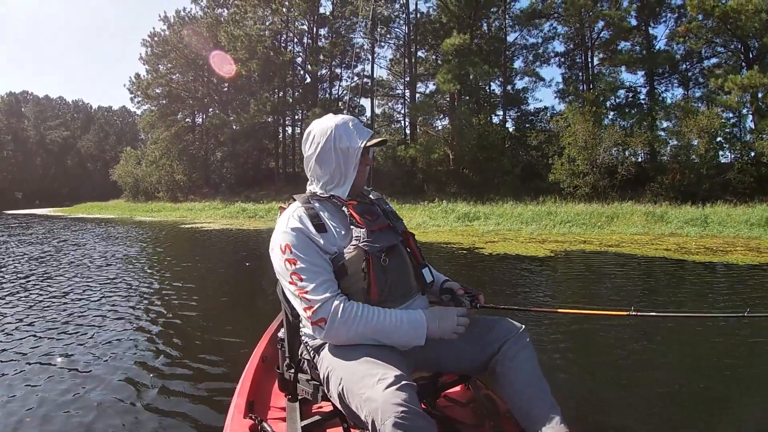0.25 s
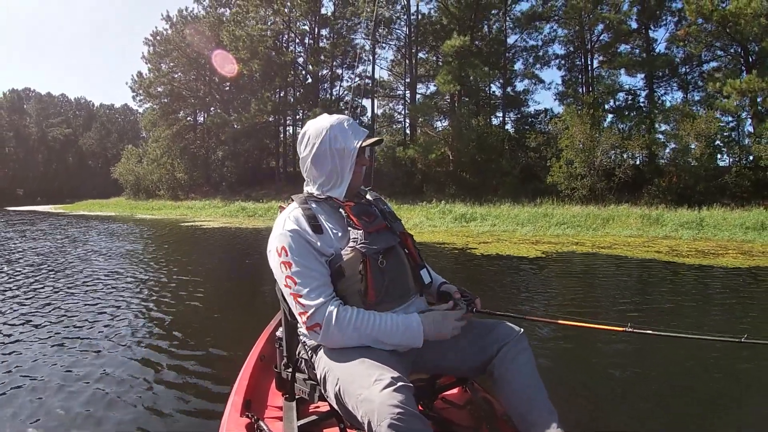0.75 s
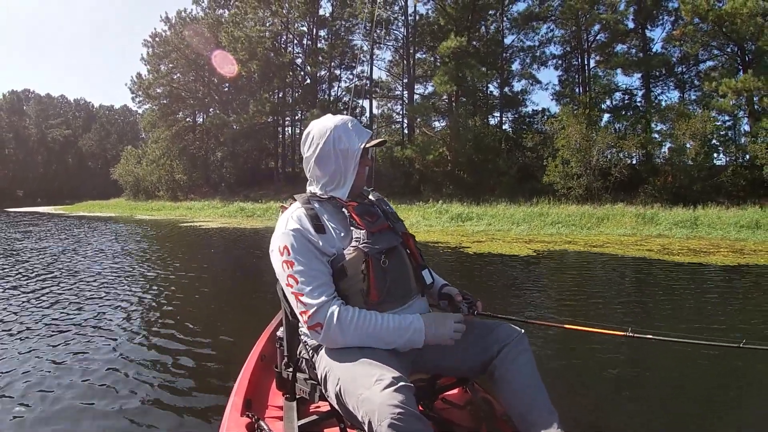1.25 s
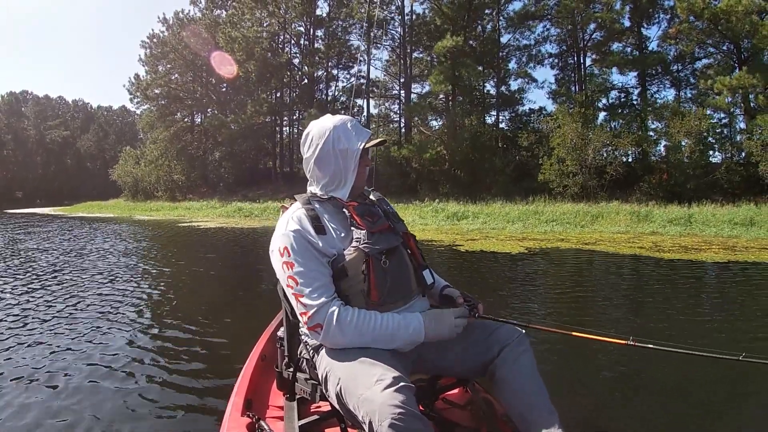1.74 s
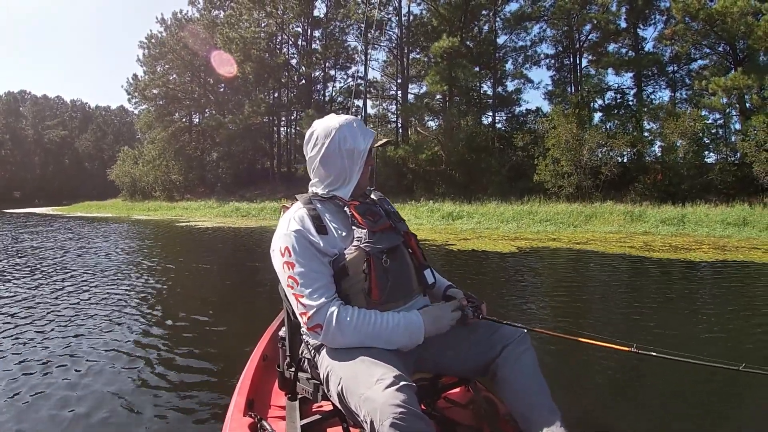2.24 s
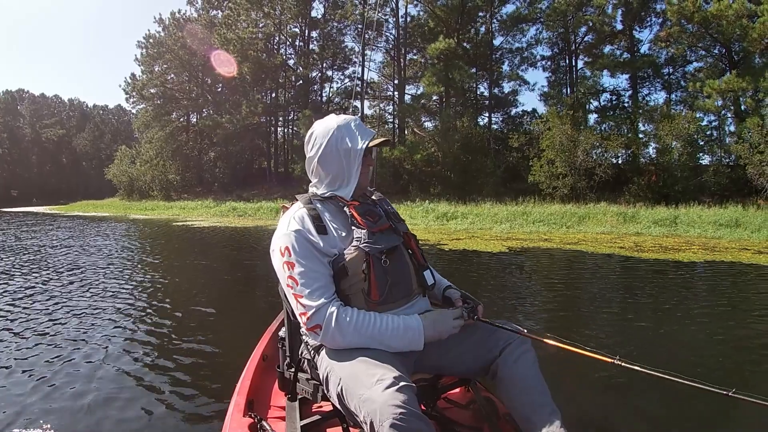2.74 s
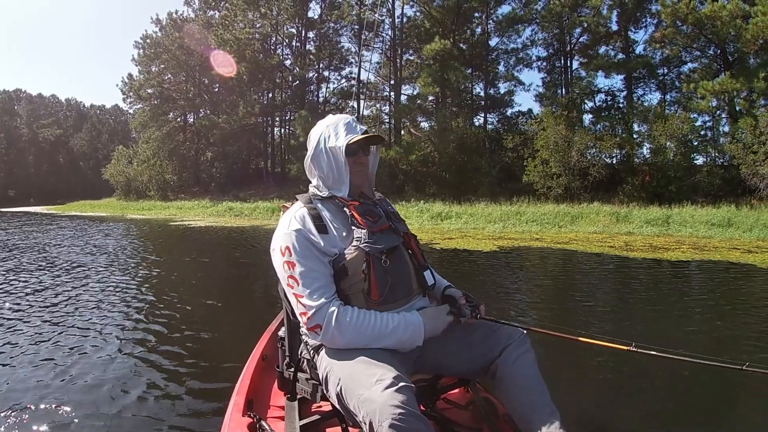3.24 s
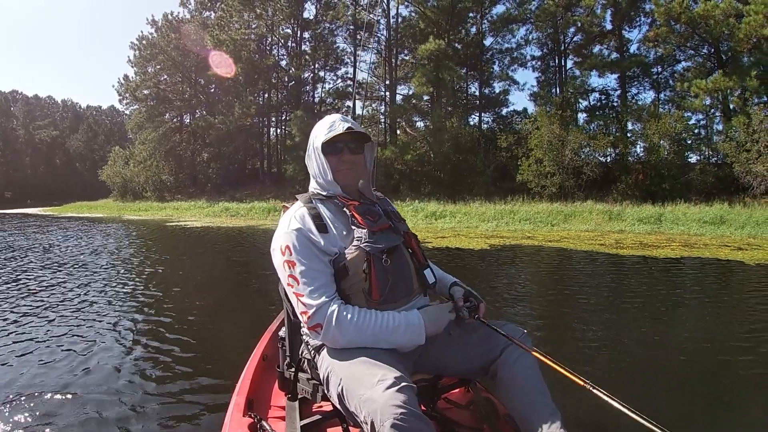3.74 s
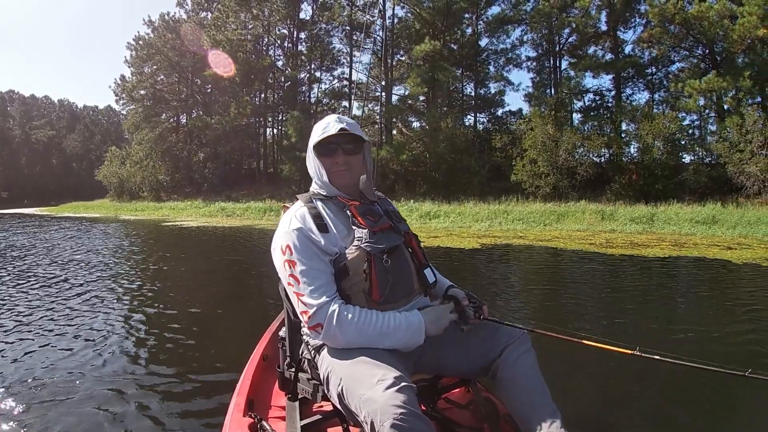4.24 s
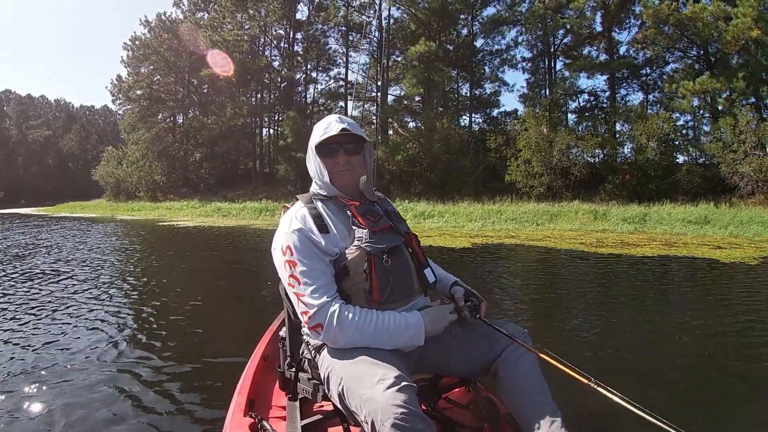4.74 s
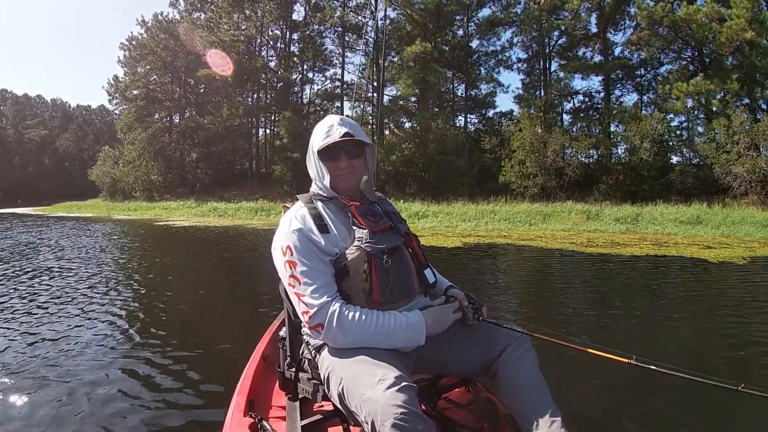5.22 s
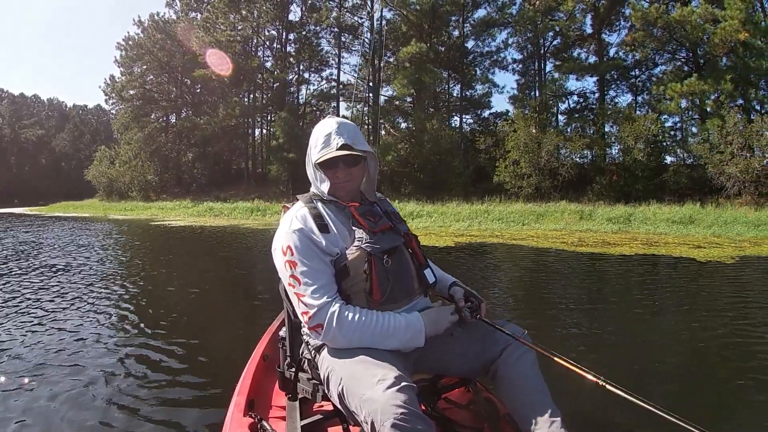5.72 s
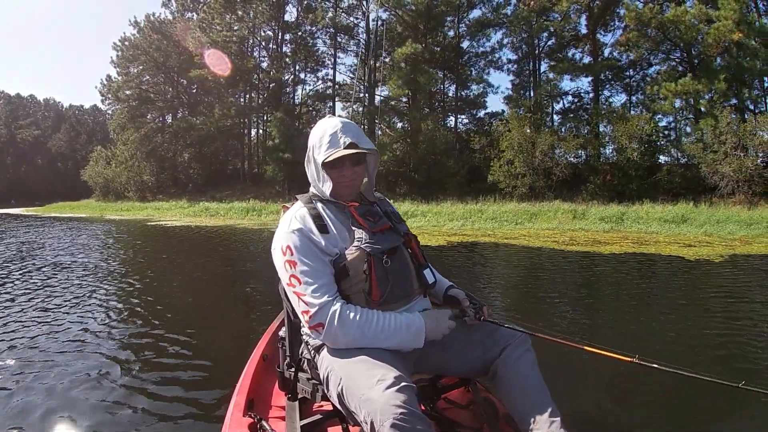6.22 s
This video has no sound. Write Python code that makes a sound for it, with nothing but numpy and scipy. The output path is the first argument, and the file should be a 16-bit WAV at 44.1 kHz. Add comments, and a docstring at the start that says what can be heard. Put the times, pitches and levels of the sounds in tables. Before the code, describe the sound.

A breezy pond edge outdoors, about six and a half seconds, heard on an open microphone. From the start a far cicada chorus makes a high, wavering hiss, with a nearer singer buzzing in a fast, raspy throb and another just dying away. Deep wind rumbles at once, then eases. A short rising bird chirp comes at 0.6, a tiny dry tick near 0.75. Wind buffets cluster around 1.4 to 1.8 and again near 2.6 to 3.2. A second cicada grows from about 1 to 2.5 and fades by 4.8, while the loudest emerges, swelling strongly from 3.5 to a peak around 5, stumbling briefly near 5.6 and 6.4. Faint birds whistle and chip throughout, most noticeably around 3.2, 3.7 and 4.4, slightly echoed by trees. A soft leafy, watery hush stays underneath. Two faint ticks come near 6.3; the shrilling continues to the end.

```python
"""Cicadas shrill in the trees beside a pond: four near singers, each a click train built from pure tones.
Behind them a far chorus is a blur of three hissing bands of noise. Wind rumbles on the microphone as low,
lumpy noise with sudden buffets, and the bank hushes softly, with a thin leafy hush of higher noise. Distant
birds whistle and chip in bending sines over blurred noise twitter; a few dry ticks are tiny puffs of noise."""
import sys
import numpy as np
from scipy import signal
from scipy.fft import rfft, irfft, next_fast_len
from scipy.io import wavfile

SR = 44100
rng = np.random.default_rng(int(sys.argv[2]) if len(sys.argv) > 2 else 0)


def master(y):
    """Save y as 16-bit WAV."""
    cut = np.clip(np.atleast_2d(y).T, -1, 1)
    pcm = np.round(cut * 32767)  # scale
    wavfile.write(sys.argv[1], SR, pcm.astype(np.int16))


N = 285327  # samples in the scene
LOWEST_HZ, CUTOFF_HZ = 3450, 15700  # bottom of the near singers' tones; top of the whole sound


def amp(db):
    """Turn decibels into a gain."""
    return 10 ** (np.asarray(db) / 20)


def rms_one(x):
    """Scale a sound to an rms (average strength) of 1."""
    return x / np.sqrt(np.mean(x ** 2) + 1e-20)


def in_time(rows):
    """Join a table's points with straight lines, giving each column a value at every sample."""
    s, *columns = np.transpose(rows)
    return [np.interp(np.arange(N) / SR, s, column) for column in columns]


def at_hz(points, hz):
    """Read a spectrum at any pitch, joining its points on a log-frequency axis."""
    table_hz, table_db = np.array(points).T
    return np.interp(np.log(hz), np.log(table_hz), table_db)


def drift(rate, step=40):
    """Slow random wandering of spread 1, one value every step samples; a higher rate wanders faster."""
    r = np.exp(-2 * np.pi * step * rate / SR)
    settle = 2000  # values thrown away while the smoothing filter settles
    white = rng.standard_normal(N // step + settle + 1)
    return rms_one(signal.lfilter([1], [1, -2 * r, r * r], white)[settle:])


def stretch(slow, step=40):
    """Read slow values at every sample."""
    return np.interp(np.arange(N) / step, np.arange(len(slow)), slow)


def hump(s, half_s):
    """A smooth rise and fall of height 1 around a moment."""
    return np.cos(np.pi / 2 * np.clip((np.arange(N) / SR - s) / half_s, -1, 1)) ** 2


def coloured(spectrum):
    """Steady noise of rms 1: white noise whose frequencies are weighted by the spectrum."""
    size = next_fast_len(N)
    hz = np.maximum(np.fft.rfftfreq(size, 1 / SR), 1)
    white = rfft(rng.standard_normal(size))
    return rms_one(irfft(white * amp(at_hz(spectrum, hz)), size)[:N])


# depth of the throb at each pitch, before each singer's own offset: f/Hz, level/dB
THROB_DEPTH = [(3400, -14), (4300, -7), (5200, -2), (6100, -3), (7000, -13.5), (8000, -19), (10000, -7),
               (16000, -12)]


def singer(rows, clicks, jitter, body, throb_per_s, throb_db, fading_db, tilt_db=np.zeros(1)):
    """A click train built from its harmonics; repeated clicks in each cycle strengthen some and cancel others."""
    rate, level_db = in_time(rows)
    lag_a, strength_a, lag_b, strength_b = in_time(clicks)
    start = int(max(rows[0][0], 0) * SR)
    end = int(rows[-1][0] * SR) if rows[-1][0] < 6 else N
    singing = slice(start, end)

    wobble = np.clip(jitter, 0, 1) * stretch(drift(60))  # timing error in cycles
    cycles = (np.cumsum(rate) / SR + wobble)[singing]
    throb_cycles = np.cumsum(throb_per_s * np.ones(N))[singing] / SR
    throb = np.exp(2j * np.pi * throb_cycles).astype(np.complex64)
    turn = np.exp(2j * np.pi * cycles).astype(np.complex64)

    step = 256  # samples between updates of the slow settings
    below_first = int(LOWEST_HZ / rate.mean())
    last = int(CUTOFF_HZ / rate.mean())
    out, power, wave = 0, 0, turn ** below_first
    for k in range(below_first + 1, last + 1):
        wave = wave * turn  # the next harmonic up
        hz = k * rate.mean()
        shape = amp(at_hz(body, hz) + tilt_db[::step] * np.log2(hz / 7000))
        comb = abs(1 + strength_a[::step] * np.exp(2j * np.pi * k * lag_a[::step]))
        # the second lag repeats both the first click and its repeat
        comb = comb * abs(1 + strength_b[::step] * np.exp(2j * np.pi * k * lag_b[::step]))
        power = power + (shape * comb) ** 2 / 2
        side = amp(throb_db + at_hz(THROB_DEPTH, hz))  # a throb puts a side line above and below
        # echoes off the trunks scatter the phases and make each line fade on its own
        lines = []
        for size in (comb, side, side):
            fading = amp(fading_db * drift(2.5, step))
            phase = np.exp(2j * np.pi * rng.random())
            slow_line = shape * size * fading * phase
            lines.append(np.repeat(slow_line, step)[singing].astype(np.complex64))
        line, above, below = lines
        out = out + (wave * (line + above * throb + below * throb.conj())).real

    song = np.zeros(N)
    song[singing] = amp(level_db[singing]) * out / np.repeat(np.sqrt(power), step)[singing]
    return song


# near singers, levels before throb and fading: t/s, click cycles per second, level/dB
# (the loud singer's level is also before its stumbles)
LOUD_SINGER = [(1.1, 281.5, -75), (1.6, 281.46, -58), (2.3, 281.37, -56.5), (2.8, 281.31, -52.8),
               (3.4, 281.19, -50.5), (3.72, 281.12, -47), (3.9, 281.03, -45), (4.32, 280.82, -45.3),
               (4.56, 280.75, -44.6), (4.8, 280.68, -41), (5.04, 280.61, -40.5), (5.4, 280.5, -42.4),
               (5.55, 280.47, -42), (5.63, 279.95, -43), (5.72, 279.91, -40.8), (5.9, 279.85, -42.2),
               (6.47, 279.7, -42.2)]
MIDDLE_SINGER = [(.5, 258, -77), (.9, 260.1, -67), (1.3, 261, -59), (1.8, 260, -55), (2.5, 259.6, -49.5),
                 (3.3, 259.9, -49), (3.9, 261.4, -50), (4.3, 260, -47), (4.8, 261.5, -77)]
EARLY_SINGER = [(0, 254.6, -51.5), (.8, 255.1, -53), (1.3, 257.3, -51), (2.0, 255.8, -53), (2.3, 257, -52),
                (2.7, 259.4, -64)]
ENDING_SINGER = [(0, 261, -50.5), (.2, 261, -67), (.45, 266, -68)]
# two lags in each cycle, each repeating the clicks before it:
# t/s, lag/cycles, strength (0-1), second lag/cycles, second strength (0-1)
LOUD_CLICKS = [(2.2, 0.37, .5, .49, .9), (2.6, .334, .9, .487, .9), (4.2, .339, 0.8, .472, 0.78),
               (4.32, .34, 0.39, .469, .9), (4.92, .344, 0.48, .46, 0.94), (5.28, .344, .5, .46, 0.11),
               (5.4, .344, .5, .439, .5), (5.5, 0.34, .9, .43, .7), (5.63, .348, 0.75, .462, 0.58),
               (5.72, 0.35, 1, .457, .5), (6.2, .348, .9, .448, .5), (6.35, .348, .9, .448, .1),
               (6.42, .348, 0.83, .46, .5)]
MIDDLE_CLICKS = [(2.5, 0.4915, .85, 0.38, .11), (3.3, .495, 0.29, .362, 0.11)]
EARLY_CLICKS = [(0, .5, 0.86, 0.313, .1), (1.3, .478, .93, 0.307, 0.075)]
ENDING_CLICKS = [(0, .464, 0.6, .3, .1)]
# sound of one click through the singer's body and the air, relative: f/Hz, level/dB
LOUD_BODY = [(3400, -22), (3900, -7.5), (4500, -7.5), (5500, -9), (6200, -4), (6750, -2), (7400, 1),
             (8100, -1.5), (9000, -13), (10000, -27.5), (11000, -35.5), (13000, -44), (16000, -43)]
MIDDLE_BODY = [(4500, -13.5), (5500, -7), (6500, -6), (7300, 2), (8000, -2), (8600, -6), (9200, -40),
               (16000, -46)]
EARLY_BODY = [(3000, -17), (3900, -12), (4800, -6.5), (6000, -7.5), (6900, 1.5), (7600, -8), (8400, -12),
              (9200, -27), (16000, -58)]
# throb of the loud singer: t/s, throbs per second, added brightness in dB per octave
LOUD_THROB = [(1.5, 130, 2), (3.7, 107, 1.5), (5.0, 110, -0.5), (5.4, 96, -1.5), (5.9, 110, 3.5),
              (6.47, 97, 3)]
# moments when the loud singer stumbles: t/s, half length/s
FALTERS = [(5.59, 0.025), (6.383, 0.022)]
FALTER_DIP_DB, FALTER_JITTER = 2, 0.011  # at the worst: loss of level, added timing jitter in cycles


def near_cicadas():
    """Four singers whose click trains throb about a hundred times a second; the loud one stumbles at times."""
    throb_per_s, tilt_db = in_time(LOUD_THROB)
    falter = sum(hump(*row) for row in FALTERS)
    loud_jitter = .001 + FALTER_JITTER * falter
    loud = singer(LOUD_SINGER, LOUD_CLICKS, loud_jitter, LOUD_BODY, throb_per_s,
                  throb_db=0, fading_db=1, tilt_db=tilt_db)
    middle = singer(MIDDLE_SINGER, MIDDLE_CLICKS, .0022, MIDDLE_BODY, 104.3, throb_db=0, fading_db=2)
    early = singer(EARLY_SINGER, EARLY_CLICKS, .0018, EARLY_BODY, 104, throb_db=-4, fading_db=2)
    ending = singer(ENDING_SINGER, ENDING_CLICKS, .002, MIDDLE_BODY, 104, throb_db=-4, fading_db=2)
    return amp(-FALTER_DIP_DB * falter) * loud + middle + early + ending


# far chorus: t/s, lower voices level/dB, middle voices level/dB, highest voices level/dB
CHORUS = [(0, -53.5, -51.5, -57.5), (1, -53.5, -53.5, -61), (2, -54.5, -58.5, -62), (3, -53.5, -53, -57),
          (3.5, -53.5, -57, -57), (3.8, -52.5, -53, -54), (4.1, -53.5, -50, -57.5), (4.5, -53, -53, -57),
          (5, -53, -50, -65), (5.4, -53, -51.5, -56), (5.7, -51, -50.5, -52.5), (6.1, -53, -53.5, -58),
          (6.47, -51, -47.5, -52)]
# colour of each band of voices, relative level in each Hz: f/Hz, level/dB
LOWER_VOICES = [(2700, -30.5), (3300, -14.5), (3900, -4), (4600, -4), (5200, -1), (5900, -0.5), (6600, -11),
                (8000, -37), (10000, -46), (16000, -90)]
MIDDLE_VOICES = [(4500, -30.5), (5600, -10), (6300, -2), (7100, 0), (7600, 0.5), (8300, -29), (10000, -60)]
HIGHER_VOICES = [(6500, -33.5), (7300, -6.5), (7800, -2.5), (8400, -3.5), (9000, -9), (9500, -15.5),
                 (10100, -19), (11500, -31.5), (13100, -32), (16000, -52)]


def far_chorus():
    """Countless distant singers blur into three bands of hiss, each swelling and sinking."""
    voices = (LOWER_VOICES, MIDDLE_VOICES, HIGHER_VOICES)
    return sum(amp(level_db) * coloured(colour) for level_db, colour in zip(in_time(CHORUS), voices))


# breeze on the microphone, before its quick random swings: t/s, level/dB
BREEZE = [(0, -28.5), (.2, -36), (.6, -39.5), (1.2, -32.5), (1.9, -37.5), (2.2, -30.5), (2.75, -41),
          (3.4, -33.5), (4.2, -33.5), (4.7, -37.5), (5.2, -40), (6, -36), (6.47, -38)]
# sudden buffets, each added to the breeze: t/s, half length/s, peak level/dB
BUFFETS = [(0.12, .08, -35), (0.709, 0.061, -37), (1.03, 0.036, -32), (1.4, 0.033, -29.5),
           (1.468, .045, -24), (1.551, 0.023, -27), (1.647, 0.045, -31), (1.748, .05, -30),
           (2.477, 0.029, -39), (2.631, 0.049, -28.5), (2.88, 0.071, -35), (3.028, .04, -25),
           (3.219, 0.018, -24.5), (3.363, 0.062, -39), (3.536, 0.031, -40), (3.997, 0.028, -35.5),
           (4.341, 0.063, -34), (4.582, 0.056, -32), (4.967, 0.034, -37), (5.098, 0.037, -29.5),
           (5.213, 0.031, -29), (5.342, 0.054, -34.5), (5.548, 0.035, -29.5), (5.675, 0.038, -35),
           (5.928, 0.036, -29), (6.332, .06, -33)]
# colour of the wind rumble, relative level in each Hz: f/Hz, level/dB
GUST_COLOUR = [(8.8, -28), (15, 3), (32, -0.5), (59, 1), (111, -8), (200, -21), (260, -32), (440, -120)]
# hush of air, leaves and water, relative level in each Hz: f/Hz, level/dB
HUSH_COLOUR = [(59, -40), (100, -3), (202, -8.5), (275, -17), (374, -20), (461, -25.5), (792, -28.5),
               (953, -34.5), (1900, -46.5), (2470, -73), (4180, -120)]
HUSH_DB = -44.5  # middle of its gentle wandering


def wind():
    """Lumpy low pressure swings on the microphone, with sudden buffets, over a nearly steady hush."""
    breeze = amp(in_time(BREEZE)[0] + 2.0 * stretch(drift(8.8)))
    buffets = sum(amp(peak_db) * hump(s, half_s) for s, half_s, peak_db in BUFFETS)
    rumble = (breeze + buffets) * coloured(GUST_COLOUR)
    hush = amp(HUSH_DB + 0.87 * stretch(drift(3.2))) * coloured(HUSH_COLOUR)
    return rumble + hush


# far-off bird twitter, and a thin leafy hush above it in pitch:
# t/s, twitter level/dB before its flutter, leafy hush level/dB
TWITTER_AND_LEAVES = [(0, -73.5, -74), (.43, -73, -74.5), (.67, -66.5, -70), (2.2, -69, -72),
                      (2.65, -72.5, -77), (3.51, -69.5, -73), (3.91, -76.5, -77.5), (4.56, -68.5, -75),
                      (4.8, -80, -79), (5.1, -72.5, -76), (6.0, -79, -80), (6.47, -70.5, -82)]
# bird notes, pitches before the waver: t/s, length/s, start f/Hz, middle f/Hz, end f/Hz, level/dB
NOTES = [(0.597, 0.054, 2190, 2740, 3240, -59), (1.098, .05, 2200, 2050, 1930, -68),
         (1.195, .07, 1596, 1540, 1480, -72), (1.45, .04, 2050, 2060, 2050, -66),
         (1.52, 0.072, 1530, 1500, 1450, -70), (1.86, .09, 1570, 1470, 1385, -69),
         (2.118, .04, 2000, 2050, 2150, -73), (2.41, .07, 1700, 1910, 2100, -73),
         (2.472, 0.17, 2060, 2110, 2090, -71), (2.51, .2, 1600, 1494, 1410, -68.5),
         (2.856, 0.095, 1990, 2190, 1850, -66), (2.935, .045, 2650, 2250, 1900, -68),
         (3.155, .04, 2350, 2610, 2950, -66), (3.184, 0.034, 2110, 2380, 1960, -61),
         (3.229, 0.062, 2650, 2380, 1950, -67), (3.668, 0.034, 2720, 2200, 1987, -62.5),
         (3.935, 0.038, 2710, 2155, 1880, -69), (4.355, 0.033, 2640, 2250, 1980, -63.5),
         (4.686, 0.035, 2780, 2340, 1980, -67), (4.922, .1, 1566, 1680, 1770, -68),
         (5.016, 0.086, 1804, 1705, 1560, -68), (5.033, .035, 3355, 2850, 2400, -67),
         (5.323, 0.039, 3350, 2880, 2400, -64.5), (5.39, .04, 2300, 2150, 2006, -74),
         (5.818, 0.13, 2550, 2410, 2340, -75), (5.97, .05, 2370, 2350, 2294, -78),
         (4.033, 0.078, 1410, 1345, 1300, -73), (4.48, .05, 2050, 1950, 1800, -74),
         (5.1, 0.047, 2140, 2050, 1950, -71), (5.71, .05, 1484, 1440, 1400, -71)]


def birds_and_leaves():
    """Wavering sines bend through three pitches with a blurred echo off the trees; twitter and leaves are noise."""
    notes, waver = np.zeros(N), stretch(drift(46))
    for s, length, start_hz, middle_hz, end_hz, level_db in NOTES:
        along, at = np.linspace(0, 1, int(length * SR)), int(s * SR)
        note = slice(at, at + len(along))
        bend = np.polyfit([0, .5, 1], [start_hz, middle_hz, end_hz], 2)
        hz = np.polyval(bend, along) * (1 + .012 * waver[note])
        swell = np.sin(np.pi * along) ** 0.27
        tone = np.sin(2 * np.pi * np.cumsum(hz) / SR)
        notes[note] += np.sqrt(2) * amp(level_db) * swell * tone

    tail_s = np.arange(SR // 4) / SR
    tail = rng.standard_normal(SR // 4) * amp(-60 * tail_s / 0.17)  # falls 60 dB in 0.17 s
    echo = signal.fftconvolve(notes, tail / np.linalg.norm(tail))[:N]

    twitter = coloured([(700, -80), (1100, -8), (1450, -3.0), (1900, -1.5), (2150, -3.5), (2500, -32), (3500, -90)])
    leaves = coloured([(1200, -78), (1900, -30), (2300, 2.5), (2700, 0.0), (3100, 4.5), (3600, -18), (5000, -88)])
    twitter_db, leaves_db = in_time(TWITTER_AND_LEAVES)
    flutter_db = 2.53 * stretch(drift(8.5))
    blurred = amp(twitter_db + flutter_db) * twitter + amp(leaves_db) * leaves
    return notes + amp(-4) * echo + blurred


# dry ticks, levels before the fade in and out: t/s, low f/Hz, high f/Hz, length/s, level/dB
TICKS = [(0.755, 4100, 5730, 0.0097, -43.5), (6.272, 1690, 2900, 0.01, -58.5),
         (6.306, 1800, 2910, 0.0074, -57)]


def ticks():
    """Each tick is a puff of band-limited noise a few milliseconds long, fading smoothly in and out."""
    out = np.zeros(N)
    for s, low_hz, high_hz, length, level_db in TICKS:
        band = signal.butter(3, [low_hz, high_hz], "band", fs=SR, output="sos")
        noise = rms_one(signal.sosfilt(band, rng.standard_normal(2000)))
        puff = noise[1000:1000 + int(length * SR)]  # skip the filter's start
        at = int(s * SR)
        out[at:at + len(puff)] += amp(level_db) * np.hanning(len(puff)) * puff
    return out


def scene():
    """All sources add up at one microphone."""
    return (near_cicadas() + far_chorus() + wind() + birds_and_leaves() + ticks())[None]


def record(dry):
    """A steep low-pass filter cuts off the very top of the sound."""
    return signal.sosfilt(signal.ellip(12, .5, 70, CUTOFF_HZ, fs=SR, output="sos"), dry)


dry = scene()
out = record(dry)
master(out)
```